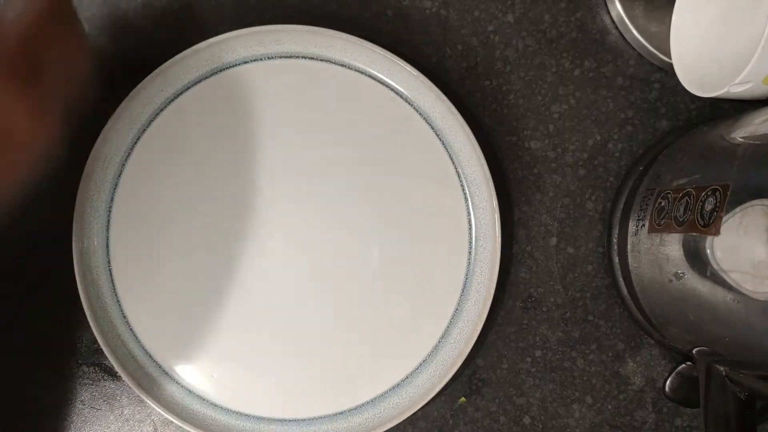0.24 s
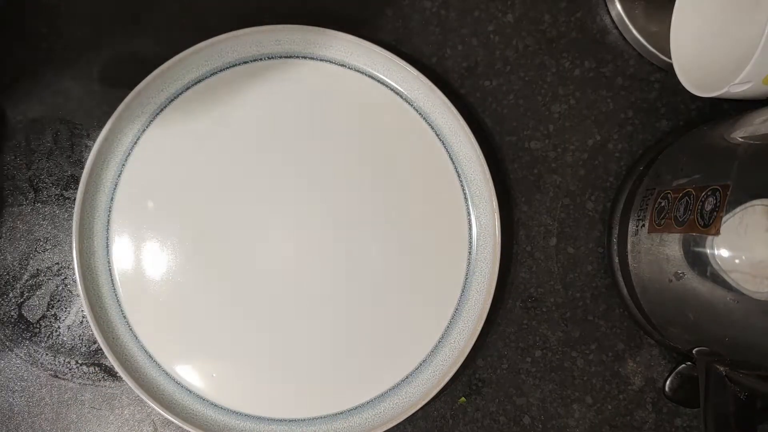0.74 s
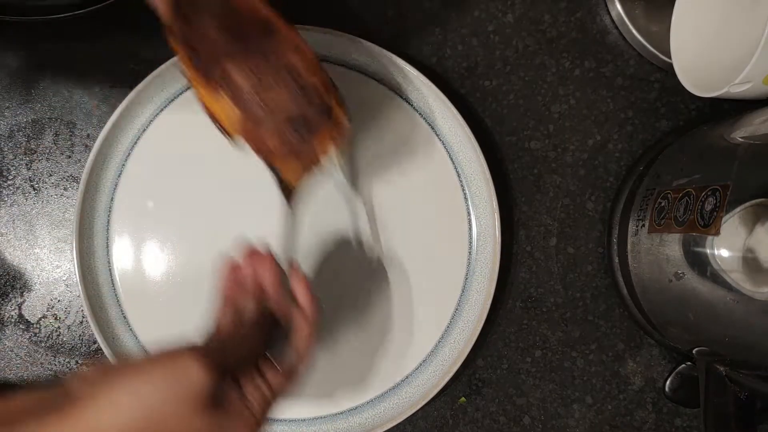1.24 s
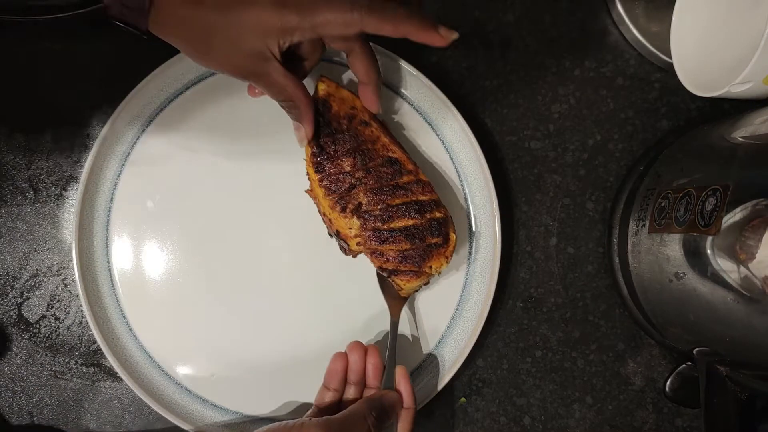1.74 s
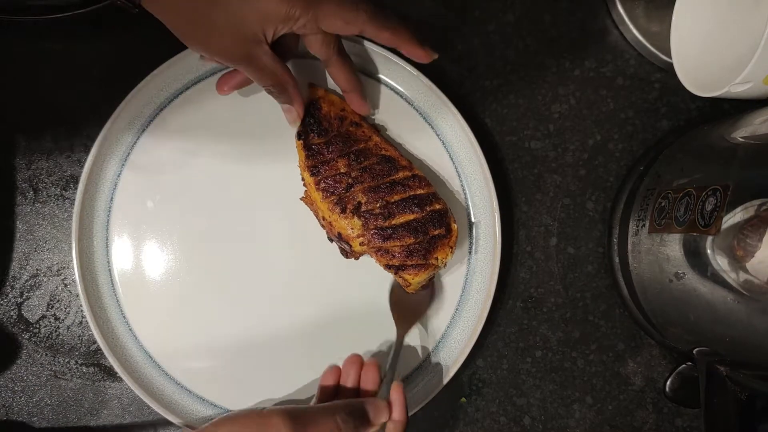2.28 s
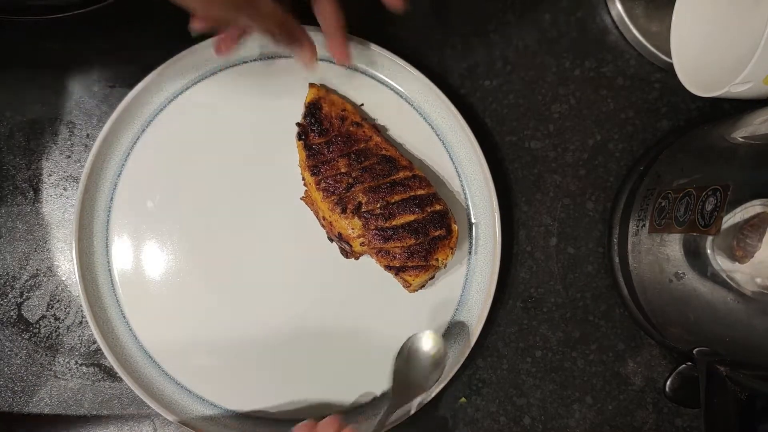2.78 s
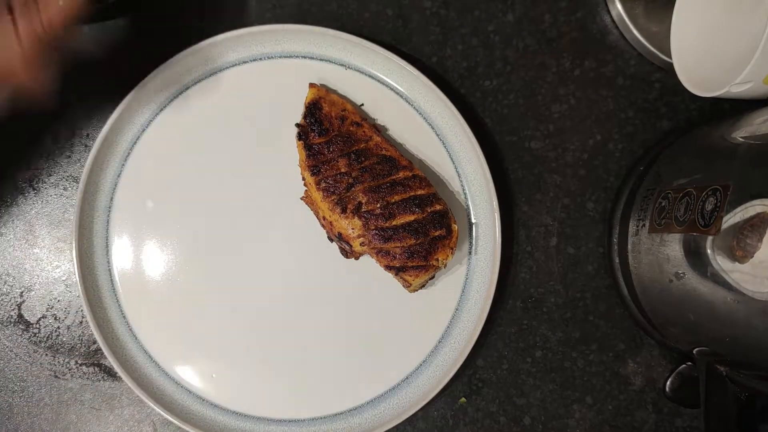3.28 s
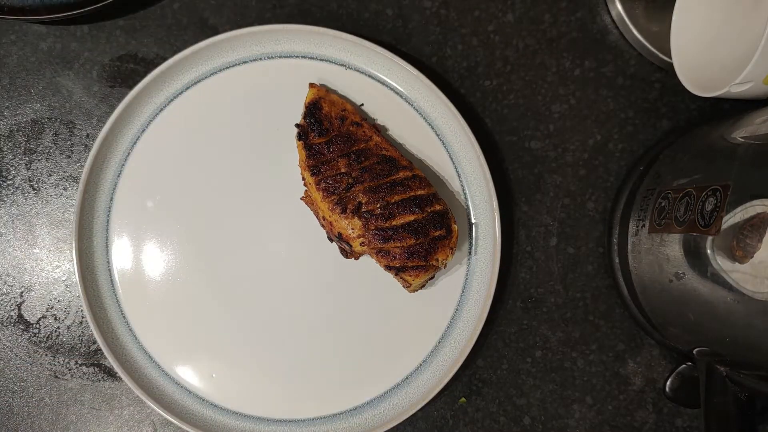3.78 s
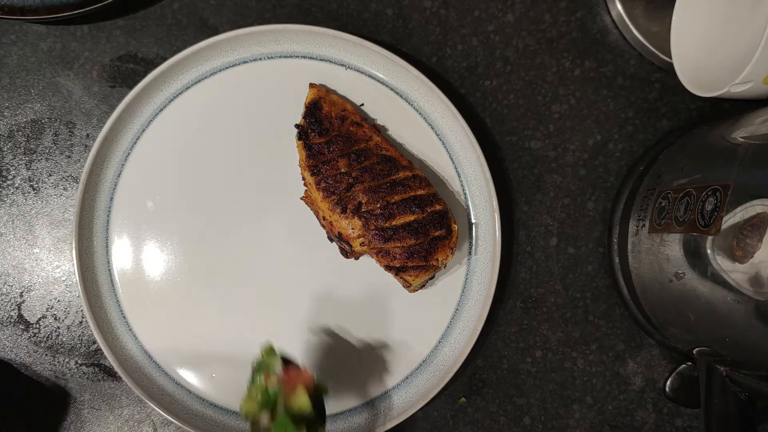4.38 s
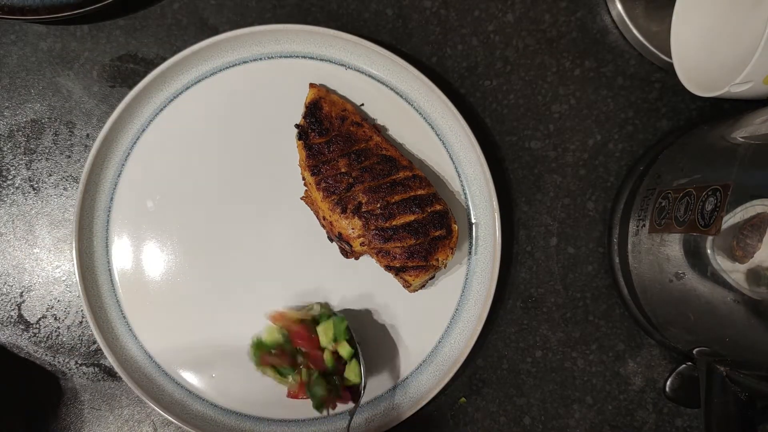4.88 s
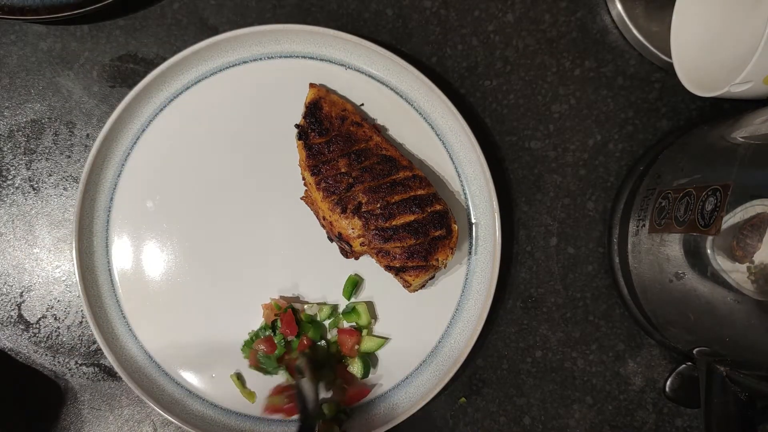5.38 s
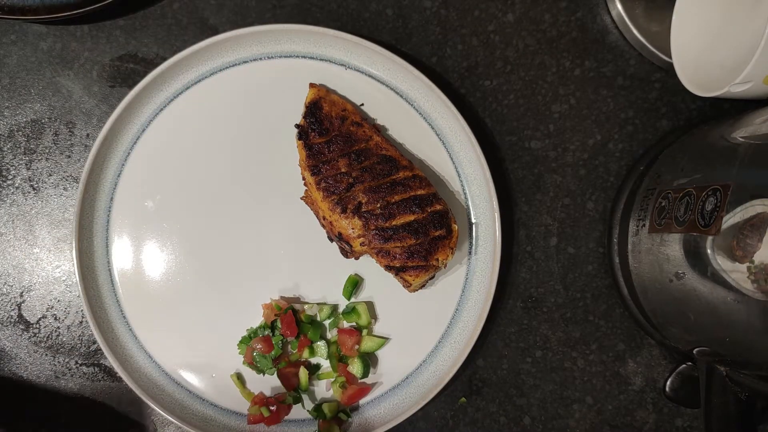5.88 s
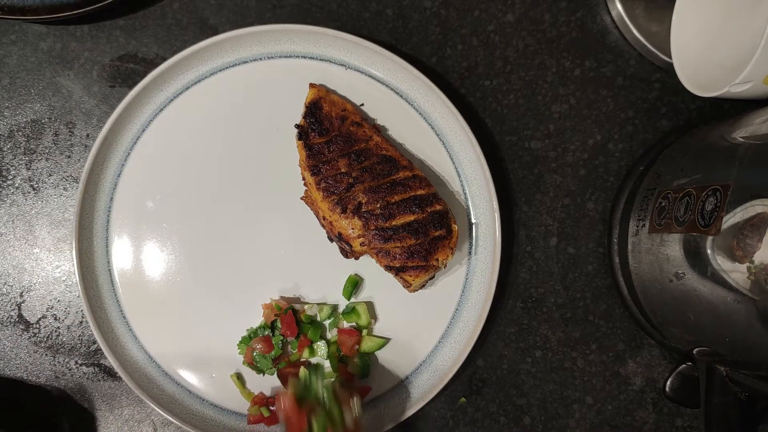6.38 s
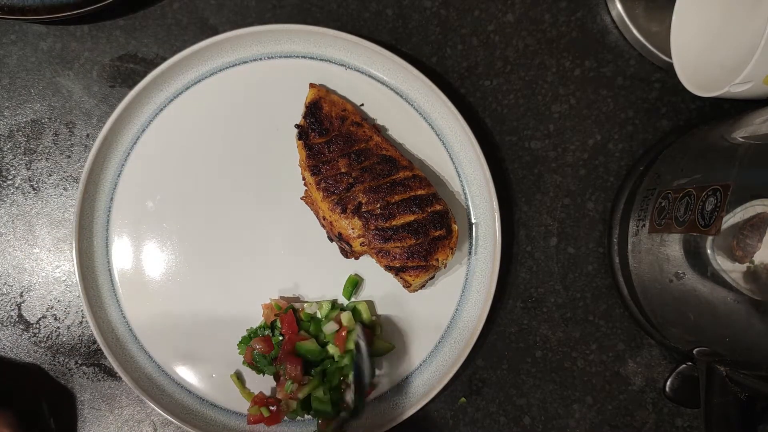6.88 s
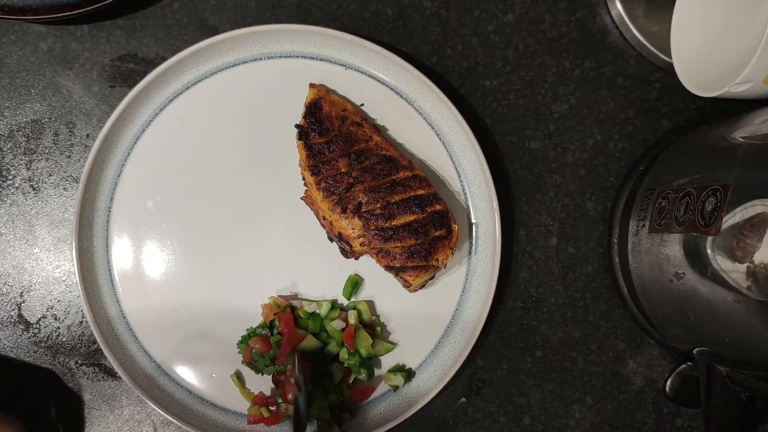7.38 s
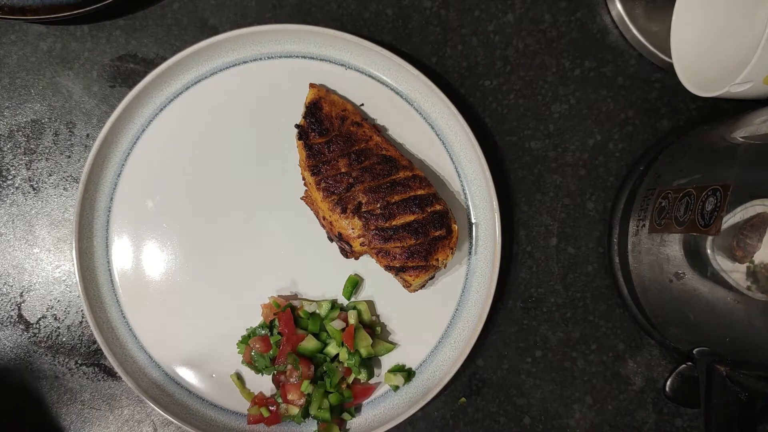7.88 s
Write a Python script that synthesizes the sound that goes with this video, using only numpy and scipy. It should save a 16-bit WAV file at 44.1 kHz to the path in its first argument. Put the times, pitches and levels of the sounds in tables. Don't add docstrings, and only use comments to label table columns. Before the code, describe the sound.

A quiet kitchen with hard surfaces, low room tone and slight hiss, picked up close in stereo, most dishes leaning left. At 0 s a dull, short counter knock with small rebounds; a sole scuffs, and at about 0.4 s gives a brief falling rubber squeak around 1.5 kHz. Another scuffing step with clicks at 0.7 s and a soft thud at 1.0 s. At 1.06 s the scene cuts, stopping the echo. Faint cloth rustle, then a sharp double spoon clink on a ceramic plate at 1.8 s. Soft taps and a tiny rim chatter at 2.2-2.4 s, rubbing around 3.2-3.6 s, then a loud ringing pan clatter at 3.64 s, bouncing away. Cut at 3.9 s. Very quiet ticks, salad snaps, leafy rustles and low bumps, notably at 5.06, 5.5 and 6.2 s. At 8.09 s a steel bowl clangs brightly in quick blows, cut off at 8.2 s.

```python
import sys
import numpy as np
from scipy import signal
from scipy.io import wavfile
from scipy.ndimage import uniform_filter1d

SR = 44100
rng = np.random.default_rng(int(sys.argv[2]) if len(sys.argv) > 2 else 0)


def persist_wave(psi):
    counts = np.round(np.clip(psi, -1, 1) * 32767).astype(np.int16)
    wavfile.write(sys.argv[1], SR, np.atleast_2d(counts).T)


def linear_from_db(decibels):
    return 10 ** (np.asarray(decibels, float) / 20)


N = 358974

# frequency in Hz, level in dB.
WARE = [(200, -34), (650, -19), (1300, -7), (2500, -10.5), (5000, -1), (6800, -5.5), (9000, -8.5),
        (11500, -14), (12500, -24), (15000, -29)]


def evened(x):
    return x / np.sqrt(np.mean(x ** 2) + 1e-20)


def read(points, hz):
    f, value = np.transpose(points)
    return np.interp(np.log(hz + 1), np.log(f + 1), value)


def add(mix, s, sound):
    part = mix[..., round(s * SR):][..., :sound.shape[-1]]
    part += sound[..., :part.shape[-1]]


def colour(x, points):
    log_gain = np.log(linear_from_db(read(points, abs(np.fft.fftfreq(4096, 1 / SR)))))
    taps = np.fft.ifft(np.exp(np.conj(signal.hilbert(log_gain)))).real[:2048]
    return signal.oaconvolve(x, taps)[:len(x)]


def resonate(x, hz, width):
    turn = np.exp(2j * np.pi * np.cumsum(hz * np.ones(len(x))) / SR)
    r = np.exp(-np.pi * abs(width) / SR)
    return 2 * (turn * signal.lfilter([1 - r], [1, -r], x / turn)).real


def struck(modes, spray, blows, lean_db):
    out, t = np.zeros((2, N)), np.arange(SR // 4) / SR
    hz, width, db, extra_db = np.transpose(modes)[:, :, None]
    sides = linear_from_db(extra_db * [[[.5]], [[-.5]]])
    sign = (-1.) ** np.arange(len(hz))[:, None]
    for s, peak_db, tilt_db, crack_db in blows:
        spot_db = 1.5 * rng.standard_normal(hz.shape)
        phase = rng.uniform(-1.96, 1, (2, *hz.shape))
        phase = phase * np.minimum(hz / 900, 1) * [[[.3]], [[1.5]]]
        height = linear_from_db(db + spot_db + tilt_db * np.log2(hz / 3000)) * width * np.exp(-np.pi * width * t)
        ring = (sides * sign * height * np.sin(2 * np.pi * hz * t + phase)).sum(1)
        ring *= 1 - np.exp(-t / 0.0002)
        crack = [colour(c * linear_from_db(-60 * t / 0.027), spray) for c in rng.standard_normal((2, len(t)))]
        body = ring / np.linalg.norm(height[:, 0]) + linear_from_db(crack_db) * np.array(crack)
        add(out, s, linear_from_db(peak_db) * body * linear_from_db([[lean_db / 2], [-lean_db / 2]]))
    return out


def plate(lean_db):
    # frequency in Hz, width in Hz, level in dB, extra lean to the left in dB.
    modes = [(829, 70, -5.5, 9), (1620, 29, 3, -2), (2477, 23.4, 6, -3.5), (2513, 20, -3, -15),
             (2926, 87, 3, -7), (2870, 46, 1.5, -17), (3260, 330, -15, -1), (3650, 45, -4, -10),
             (3720, 26, 1.5, -12), (3820, 60, -11, -11), (4243, 38, 1.5, -5), (4770, 18.5, -4, -10),
             (5220, 60, -21, -8), (5650, 16, -4.5, -3), (6130, 25, -11, -7), (6394, 58, -11, 0),
             (7610, 60, -26, -3), (8060, 270, -12, 5), (8280, 43, -19, -1), (8340, 40, -7, -2),
             (8510, 40, -12, 0), (9360, 31, -18, -10), (10340, 210, -17, -14), (12300, 62, -21, 8),
             (13340, 110, -34, -2)]
    # start in seconds, peak in dB, treble tilt (hardness) in dB an octave, crack in dB.
    blows = [
        (1.8150, -23, 0.2, 0.91),
        (1.8171, -25.5, 0, 0.86),
    ]
    return struck(modes, WARE, blows, lean_db)


def chatter():
    s = 2.299 + 0.023 * np.arange(4)
    top_s, top_db, swell_db_per_s, fade_db_per_s = 2.326, -53.5, 300, 200
    under_db = np.maximum(swell_db_per_s * (top_s - s), fade_db_per_s * (s - top_s))
    tilt_db, crack_db = -1, -22
    return [(at, top_db - db, tilt_db, crack_db) for at, db in zip(s, under_db)]


def rim(lean_db):
    # frequency in Hz, width in Hz, level in dB, extra lean to the left in dB.
    modes = [(845, 84, -18.5, 4), (1600, 25, -12, 3), (2520, 27, -5, 3), (2636, 51, -5.5, -2),
             (2890, 56, -10, 0), (3740, 50, -15, -2), (4262, 25, -11, -5), (4740, 45, -20, -5),
             (7870, 50, -17, 0), (8320, 41, -17.5, -3), (9160, 100, -24, 0)]
    # start in seconds, peak in dB, treble tilt in dB an octave, crack in dB.
    taps = [
        (2.2297, -50.5, -9.5, -3),
        (2.285, -63, -4, -10),
    ]
    return struck(modes, WARE, taps + chatter(), lean_db)


def pan(lean_db):
    # frequency in Hz, width in Hz, level in dB, extra lean to the left in dB.
    modes = [(459, 37, -8.5, 0.5), (806, 130, -20, -1.5), (1420, 120, -10.5, 6), (1456, 11, -0.5, -8),
             (2010, 95, -12, -5.5), (2150, 40, -7, 0), (2180, 30, -9, -5.5), (2238, 19, -2.5, 0),
             (2317, 25, -0.5, -5), (2329, 10, 0.5, -3.5), (2369, 15, 9, -4.5), (2346, 16, 7, -3),
             (2443, 34, -2.5, -0.5), (2605, 48.6, -13, -3), (2682, 55, -14, -2), (2900, 100, -16.5, -5.5),
             (3743, 40, -8.5, -3.5), (4350, 83, -16.5, -2.5), (4570, 25, -4, 0), (4670, 11, -2, -10.5),
             (4727, 32, -6, 1), (4730, 44, -10, -6.5), (5048, 35, -15, -7), (6134, 40, -6, -3),
             (6280, 23, -6.5, -4), (6400, 32, -11.5, -3), (6520, 62, -8.5, 6), (7100, 65, -15, 6),
             (8120, 74, -21, 1), (9030, 53, -23, 11), (9070, 60, -22, 6), (9600, 130, -19.5, 0.5),
             (10700, 110, -23, -1), (13100, 150, -30.5, 11), (14700, 160, -31.5, -2.5)]
    # frequency in Hz, level in dB.
    metal = [(300, -43), (1200, -2), (2400, -6.5), (4700, 0.5), (5150, -16), (5300, -45), (5650, -45),
             (5850, -13), (6300, 0.5), (9000, -11), (12000, -13), (15500, -27)]
    # start in seconds, peak in dB, treble tilt in dB an octave, crack in dB.
    blows = [
        (3.6411, -25, 1.5, 0),
        (3.649, -19, 0, -5),
        (3.659, -25, -5.5, -10),
        (3.677, -36, 1, -14),
        (3.697, -46, -1, -16),
        (3.731, -40.5, -2.5, -23),
        (3.889, -60.5, -9.5, -2),
    ]
    return struck(modes, metal, blows, lean_db)


def bowl(lean_db):
    # frequency in Hz, width in Hz, level in dB, extra lean to the left in dB.
    modes = [(664, 27, -16, -4), (1440, 47, -4.5, -2), (2051, 18.5, 4, 1), (2430, 42, -7, -21),
             (2534, 41, -2.5, -1), (2640, 95, -9.5, 7), (2776, 110, -12, 8), (3020, 52, -9, -9),
             (3470, 69, -8, 2), (3767, 35, -3.5, -12.5), (4120, 110, -20, 12), (4243, 26, -2, -13),
             (5170, 24, -5, -5), (6100, 50, -17, -6), (6280, 29, -2, -2), (6810, 26, 4.5, 14),
             (7830, 33, -11, 1), (8070, 40, -10.5, -3), (8230, 130, -25, -3), (8950, 21.2, -10, -3),
             (9635, 20, -7, 2.5), (10680, 35.5, -8, 1), (11500, 60, -29, 3), (13000, 39, -12, -4),
             (13500, 150, -22, -1), (14656, 35, -17, 0.5)]
    # start in seconds, peak in dB, treble tilt in dB an octave, crack in dB.
    blows = [
        (8.0906, -18, 4, -14),
        (8.0930, -17, 3.5, -6.5),
        (8.0948, -24, 4, -3),
        (8.0977, -21.5, -4.5, -10),
        (8.101, -29, 0.5, -2),
        (8.1045, -33, -2, -5),
        (8.1165, -18, -2.5, -6),
        (8.1375, -22, 1, -5),
    ]
    return struck(modes, WARE, blows, lean_db)


def laden_plate(lean_db):
    # frequency in Hz, width in Hz, level in dB, extra lean to the left in dB.
    modes = [(987, 31, 3, 7.5), (1628, 38, -12.5, -6), (2560, 42, -16, 0)]
    # start in seconds, peak in dB, treble tilt in dB an octave, crack in dB.
    blows = [
        (5.027, -66, 2, -8),
        (5.0567, -57, 4, -6),
        (7.335, -66, -14, -4),
    ]
    return struck(modes, WARE, blows, lean_db)


def counter(lean_db):
    # frequency in Hz, width in Hz, level in dB, extra lean to the left in dB.
    modes = [(200, 40, -5, 3), (297, 27, -4.5, -2), (860, 244, -4, 1), (1150, 120, -14, -5),
             (1695, 49, -5, 0), (2100, 240, -18, -2)]
    # start in seconds, peak in dB, treble tilt in dB an octave, crack in dB.
    blows = [
        (.001, -38, -0.5, -29),
        (.008, -55, 5, -20),
        (.014, -47, -3, -19),
        (.024, -48.5, -7.5, -25),
    ]
    return struck(modes, WARE, blows, lean_db)


def squeak():
    # time in seconds, level in dB, pitch in Hz.
    glide = [
        (.384, -60, 1620),
        (.390, -51, 1560),
        (.402, -51, 1490),
        (.42, -52, 1420),
        (.437, -54, 1330),
        (.446, -68, 1350),
        (.46, -61, 1450),
        (.48, -68, 1400),
        (.5, -74, 1400),
    ]
    out, (s, db, hz) = np.zeros(N), np.transpose(glide)
    t = np.arange(s[0], s[-1], 1 / SR)
    wobble, stutter = (evened(uniform_filter1d(v, 90)) for v in rng.standard_normal((2, len(t))))
    turns = 2 * np.pi * np.cumsum(np.interp(t, s, hz) * (1 + 0.028 * wobble)) / SR
    tone = np.sin(turns) + linear_from_db(-7) * np.sin(2 * turns)
    tone += linear_from_db(1) * np.sin(.86 * turns) * (t < .43)
    level_db = np.interp(t, s, db) + 4.3 * stutter
    add(out, s[0], tone * linear_from_db(level_db) * signal.windows.tukey(len(t), .1))
    return out


def swells():
    # start, peak and end in seconds, peak level in dB, brightness in dB.
    strokes = [(1.197, 1.408, 1.8, -68.5, 1.5), (2.851, 3.197, 3.24, -64, -6), (3.298, 3.606, 5.4, -64, -8),
               (4.963, 5.064, 5.2, -66.5, -6), (5.42, 5.53, 5.5, -76, 3), (6.103, 6.175, 6.42, -65, 2),
               (6.202, 6.278, 6.33, -65, 6), (6.805, 6.867, 7.05, -70, -5), (7.002, 7.183, 7.3, -68, -13),
               (7.768, 7.79, 8.4, -78, 10), (8.02, 8.072, 6.6, -67, -1)]
    rows = []
    for t0, top, t1, db, bright_db in strokes:
        end_db = db - 15.5
        rows.append([(t0, end_db, bright_db), (top, db, bright_db), (t1, end_db, bright_db)])
    return rows


def rubs():
    # time in seconds, level in dB, brightness at the top in dB.
    scuffs = [
        [(0.0, -83, 10), (0.008, -60, -15), (0.052, -74, -9), (0.062, -65, -7), (0.12, -74, -1),
         (0.35, -71.5, 9.5), (0.402, -53, -7.5), (0.456, -58.5, 2.5), (0.7, -84, 12)],
        [(0.7, -67, 3), (0.726, -58, -17), (0.758, -76, 22), (0.994, -68.5, 17.5), (1.062, -56, -0.5),
         (1.07, -80, 0)],
    ]
    # frequency in Hz, level in dB.
    rub_spectrum = [(150, -10), (500, 3), (1500, 1), (3500, -1.5), (6500, -8.5), (10000, -7.5),
                    (16000, -26.5)]
    out = np.zeros((2, N))
    for rows in scuffs + swells():
        s, db, bright_db = np.transpose(rows)
        t = np.arange(s[0], s[-1], 1 / SR)
        for side in out:
            slips = rng.standard_normal(len(t)) * linear_from_db(2.0 * rng.exponential(1, len(t)))
            dull = evened(colour(slips, rub_spectrum))
            top = resonate(dull, 7400, 4560)
            stroke = dull + (linear_from_db(np.interp(t, s, bright_db)) - 1) * top
            pressure = linear_from_db(np.interp(t, s, db) - 2.5)
            add(side, s[0], pressure * stroke * signal.windows.tukey(len(t), .08))
    return out


def contacts(rows, rise):
    out, t = np.zeros(N), np.arange(SR // 4) / SR
    for s, peak_db, hz, width, t60 in rows:
        puff = resonate(rng.standard_normal(len(t)) * np.exp(-t / 0.00081), hz, width) * 1.72
        puff += resonate(rng.standard_normal(len(t)), hz, width) * linear_from_db(-60 * t / max(t60, .005)) * 0.8
        puff = resonate(puff, hz, 2.8 * width + 120) * (1 - np.exp(-t / rise))
        add(out, s - rise, linear_from_db(peak_db) * puff / abs(puff).max())
    return out


def alike(rows, shared):
    return [(*row, *shared) for row in rows]


def ticks_and_snaps():
    # start in seconds, peak in dB.
    ticks = [(0.459, -46), (0.7175, -53), (4.1517, -58), (4.182, -60), (4.5062, -61.5), (4.9147, -61),
             (5.469, -46.5), (6.2592, -48.5), (6.3121, -54.5), (6.556, -61.5), (6.8538, -60), (6.8744, -72),
             (7.2394, -70), (7.9618, -54)]
    snaps = [(2.534, -61), (4.7874, -75), (4.8224, -74), (4.956, -61), (5.0344, -64), (5.0564, -50),
             (5.3235, -55.5), (6.1355, -53), (7.4264, -69), (7.8002, -60), (7.9294, -65)]
    # centre in Hz, width in Hz, t60 in seconds.
    tick_shape = (9800, 7800, .018)
    snap_shape = (8100, 2400, 0.025)
    return contacts(alike(ticks, tick_shape) + alike(snaps, snap_shape), 0.00019)


def knocks_and_pings():
    # start in seconds, peak in dB, centre in Hz, width in Hz, t60 in seconds.
    knocks = [(.064, -46, 1880, 865, 0.024), (.367, -50.5, 1800, 800, 0.033), (.708, -51, 1570, 700, 0.029),
              (.727, -42, 1440, 400, 0.073), (.729, -43, 690, 393, 0.072), (.747, -67, 870, 500, .05),
              (3.888, -52, 1390, 500, 0.044), (3.889, -51, 2100, 700, 0.036), (7.962, -57, 4500, 2000, .02),
              (5.057, -66, 3000, 3020, .02), (5.324, -61.5, 3500, 2500, 0.024), (6.15, -65, 2900, 300, .06),
              (6.176, -56.5, 2900, 200, 0.073), (6.259, -54, 1780, 900, 0.017),
              (6.26, -49, 4020, 2200, 0.02), (6.879, -63, 3810, 600, 0.036),
              (7.245, -64.5, 6150, 899, 0.053)]
    pings = [
        (0.019, -57.5, 3200, 41, 0.1),
        (.43, -75, 11500, 150, .25),
        (1.2, -55, 480, 43, 0.054),
        (6.93, -62.5, 550, 37, 0.94),
        (3.499, -55, 480, 70, 0.37),
    ]
    return contacts(knocks + pings, .0006)


def thuds_and_booms():
    # start in seconds, peak in dB, centre in Hz.
    thuds = [
        (1.013, -48.5, 181),
        (1.04, -51, 477),
        (1.819, -49, 185),
        (3.839, -57.5, 454),
        (4.829, -52.5, 109),
        (5.059, -50.5, 200),
        (6.177, -55, 465),
        (6.198, -58, 153),
        (8.1, -37, 154),
    ]
    # width in Hz, t60 in seconds.
    thud_shape = (52, 0.058)
    # start in seconds, peak in dB, centre in Hz, width in Hz, t60 in seconds.
    booms = [
        (3.646, -46.5, 156, 63, 0.084),
        (3.646, -46, 77, 58, 0.15),
        (5.062, -58, 55, 32, 0.23),
        (6.119, -60, 38, 16, .2),
        (8.098, -47.5, 94, 32, 0.2),
    ]
    return contacts(alike(thuds, thud_shape) + booms, 0.0028)


def kitchen():
    # frequency in Hz, t60 in seconds.
    decay = [(150, 0.19), (600, 0.34), (2400, 0.5), (5000, 0.47), (9000, 0.39), (15000, 0.36)]
    size = SR * 3 // 4
    taps = np.zeros((2, size))
    at = np.arange(60, size - 12, 12) + rng.integers(0, 12, (2, (size - 61) // 12))
    np.put_along_axis(taps, at, rng.choice([-1., 1.], at.shape), 1)
    hz, t, z = signal.stft(taps, SR, nperseg=128)
    late_db = -60 * t / read(decay, hz)[:, None]
    fade = linear_from_db(late_db / 0.55) + linear_from_db(late_db - 2.5)
    tail = signal.istft(z * fade, SR, nperseg=128)[1][:, :size]
    tail *= 1 - np.exp(-np.arange(size) / SR / 0.00131)
    return tail / np.linalg.norm(tail[0])


def air():
    # frequency in Hz, level in dB.
    tone_spectrum = [(20, -3.5), (60, 1), (130, -0.5), (300, -8), (700, -13), (1500, -18.5), (3000, -23),
                     (5000, -30), (9000, -32), (16000, -31)]
    # frequency in Hz, left-right likeness.
    likeness = [(40, 0.29), (130, 0.37), (300, 0.18), (700, 0.042), (2000, 0.097)]
    frames, hz = N // 256 + 5, np.fft.rfftfreq(1024, 1 / SR)
    a, b, c, d, patches = rng.standard_normal((frames, 513, 5)).T
    patches = evened(uniform_filter1d(uniform_filter1d(patches, 14, 0), 20, 1))
    same, left = np.clip(read(likeness, hz), -1, 1)[:, None], a + 1j * b
    right = same * left + np.sqrt(1 - same ** 2) * (c + 1j * d)
    z = np.array([left, right]) * linear_from_db(read(tone_spectrum, hz)[:, None] + 1.08 * patches)
    return evened(signal.istft(z, nperseg=1024, noverlap=768)[1][:, :N])


def scene():
    cuts = [0, 1.064, 3.897, 8.2]
    air_db = [-63.5, -64.5, -64.5]
    leans_db = [-5.5, 8, 3.5, 4.5, 7.5, 9.5]
    sends_db = [7, -3, 0.5, -1.5, -3, -9, -3.5]
    wares = [counter, plate, rim, pan, bowl, laden_plate]
    to_left = linear_from_db([[1.5], [-4]])
    small = (ticks_and_snaps() + knocks_and_pings()) * to_left + thuds_and_booms()
    near = [ware(lean_db) for ware, lean_db in zip(wares, leans_db)] + [small]
    sole = squeak()
    send = sum(linear_from_db(db) * x.mean(0) for db, x in zip(sends_db, near)) + sole * linear_from_db(-4.5)
    direct = sum(near) + sole * to_left + rubs()
    tone, tail, out = air(), kitchen(), np.zeros((2, N))
    for t0, t1, tone_db in zip(cuts, cuts[1:], air_db):
        view = slice(round(t0 * SR), round(t1 * SR))
        echo = signal.fftconvolve(send[None, view], tail, axes=1)[:, :send[view].size]
        out[:, view] = direct[:, view] + linear_from_db(0.5) * echo + linear_from_db(tone_db) * tone[:, view]
    return out


def top_cut(x):
    return signal.sosfilt(signal.butter(12, 16510, fs=SR, output="sos"), x)


def record(dry):
    # frequency in Hz, level in dB; the left rings near 8.4 kHz, the right is shaded from 7 to 12 kHz.
    left_port = [(5000, 0.5), (7000, -6.5), (7600, 4.5), (8000, 9), (8400, 13), (9200, 6.5), (10500, 3.5),
                 (11500, 1), (14000, 3)]
    right_port = [(4000, 1), (6800, 2.5), (7500, -14), (8300, -33), (9300, -25), (11000, -3.5),
                  (14000, 2.5)]
    late = np.pad(dry[1], (20, 0))[:N]
    ports = np.array([colour(dry[0], left_port), colour(late, right_port)])
    ports += linear_from_db(-84.5) * rng.standard_normal((N, 2)).T
    ports = signal.oaconvolve(ports, signal.firwin(255, 15850, fs=SR)[None], "same")
    return top_cut(ports)


dry = scene()
out = record(dry)
persist_wave(out)
```